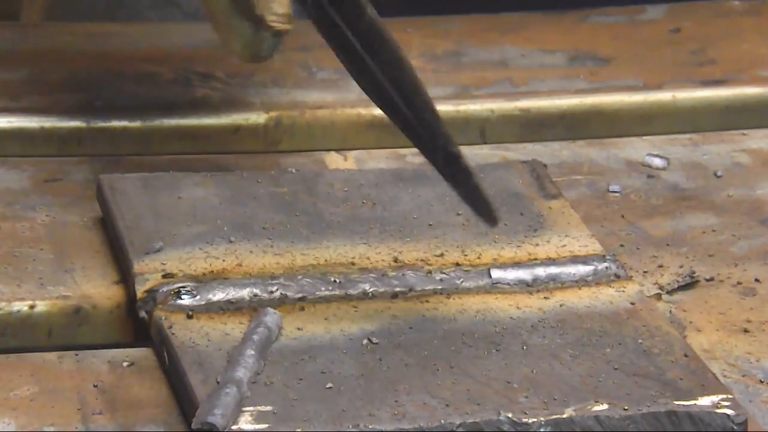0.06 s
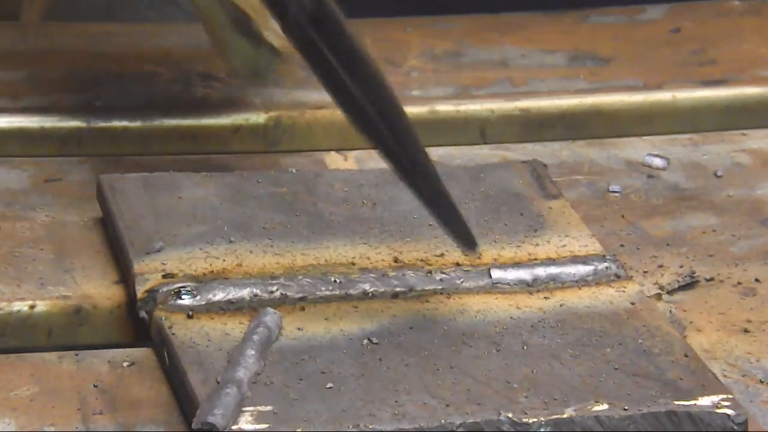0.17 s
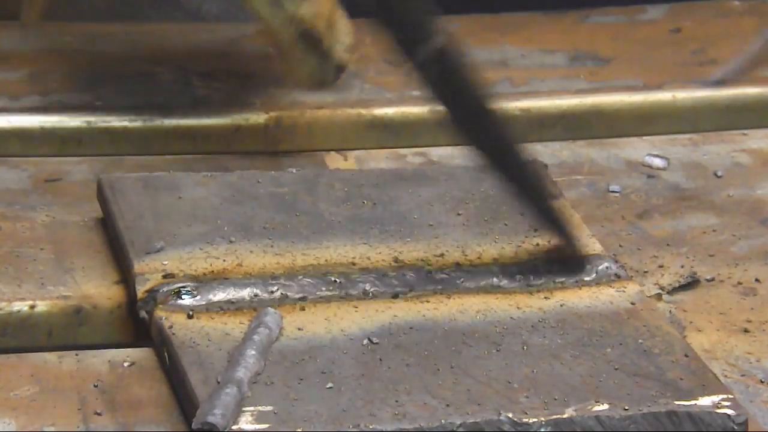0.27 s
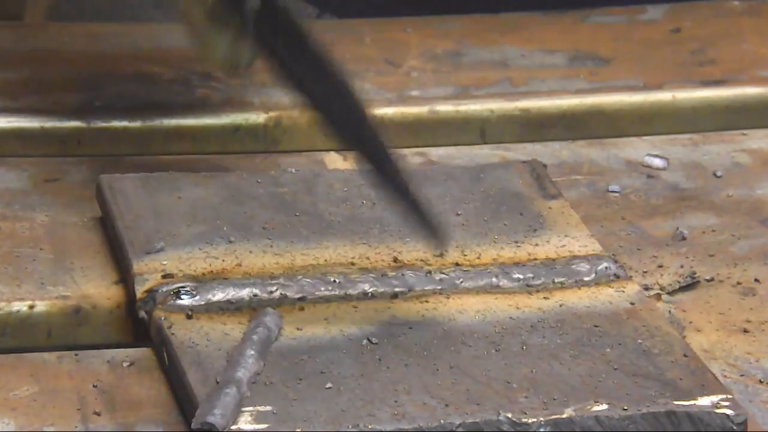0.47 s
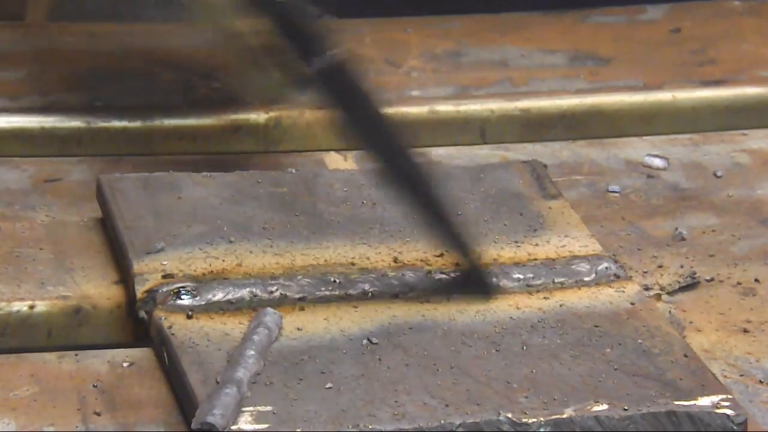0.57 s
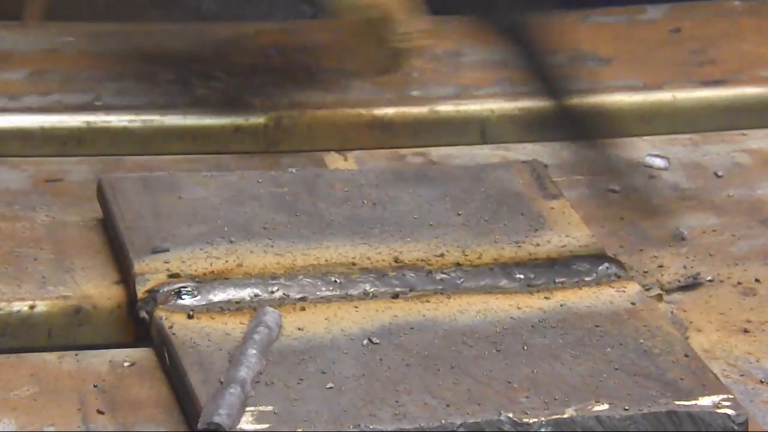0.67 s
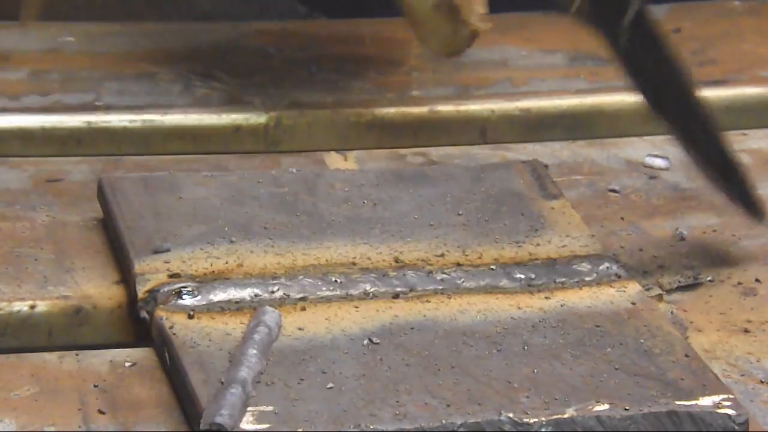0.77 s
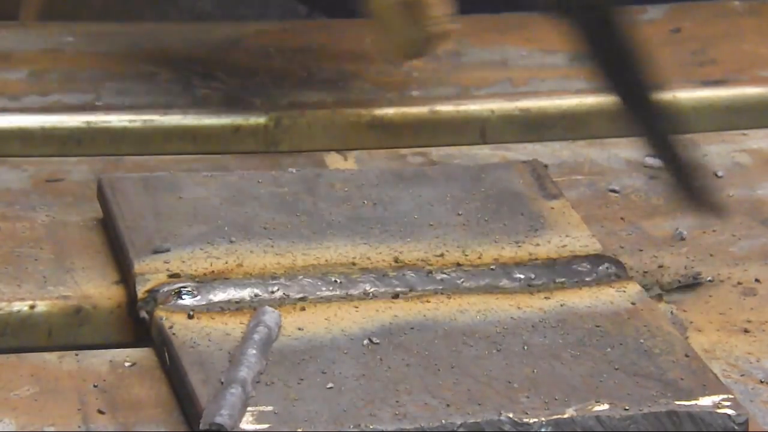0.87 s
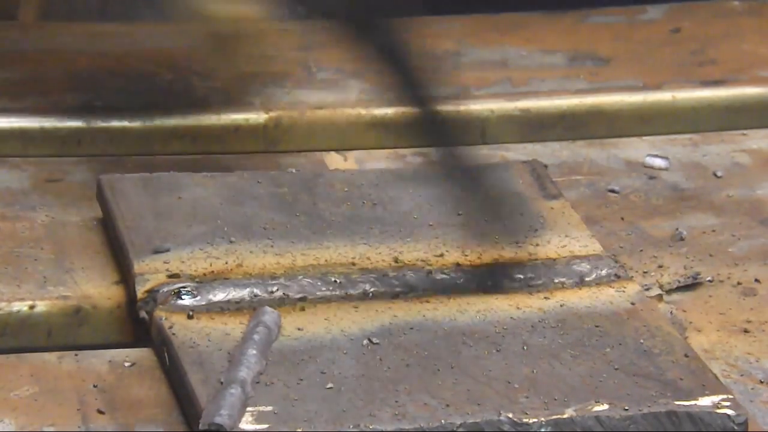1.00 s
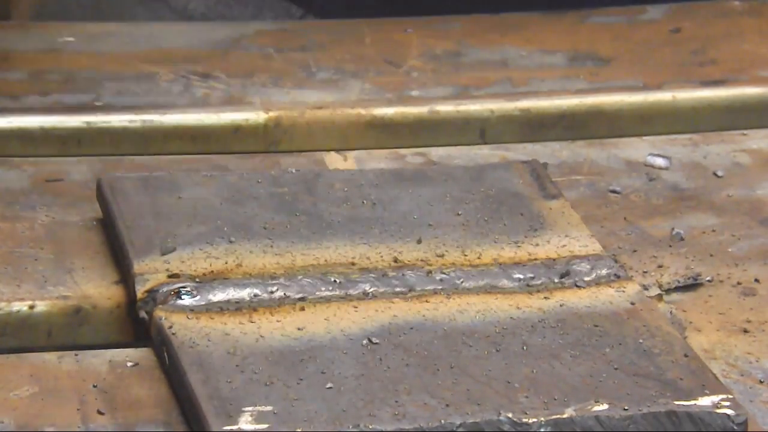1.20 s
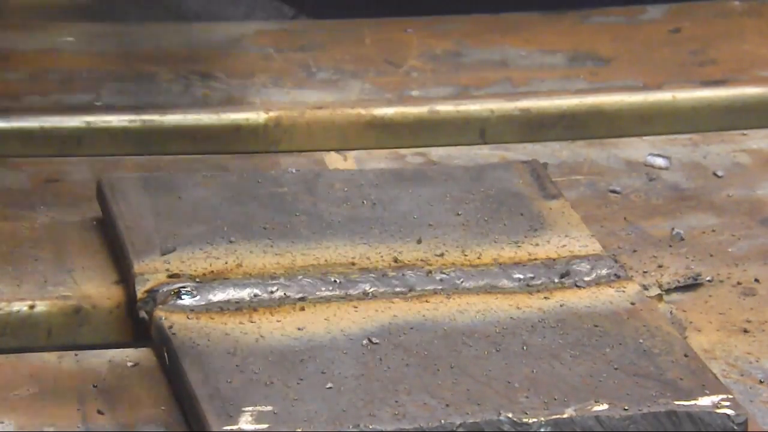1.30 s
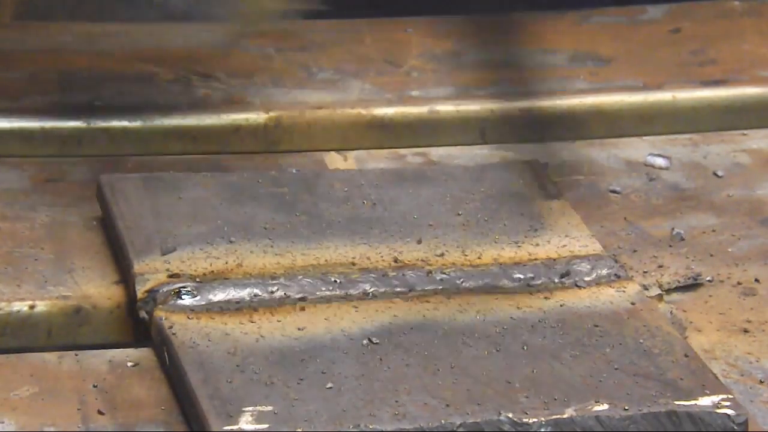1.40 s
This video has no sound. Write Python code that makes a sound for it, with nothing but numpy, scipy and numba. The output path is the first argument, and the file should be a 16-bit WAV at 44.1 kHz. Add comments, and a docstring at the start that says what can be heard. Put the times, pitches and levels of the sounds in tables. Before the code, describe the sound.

Slag is scraped off a steel weld with a pointed tool, close up. Faint workshop hum, then a sharp tick and short gritty scrape at 0.23-0.4 s. A second clicks at 0.53 s, bites hardest near 0.66 s and fades by 0.77 s. The third, 0.98-1.25 s, is longest, rattling with clinks and snapping slag. Chips tick and skitter at 1.24 and 1.3 s; short room reflections, peaks slightly clipped.

```python
"""A pointed steel tool strikes a weld bead and drags along it in three quick strokes; plate and tool ring briefly.
Blows are decaying bright noise that rings steel modes; the drag is dense random grains through the same steel.
Slag snaps off in very short bursts and chips fall with a tick and skitter, over a little room sound.
Workshop noise and a few narrow hum tones lie below. The pair of signals differs slightly in lag and treble;
a gain control sinks under the strokes and the highest peaks clip."""
import sys
import numpy as np
from scipy import signal
from scipy.fft import rfft, irfft, next_fast_len
from scipy.io import wavfile
from numba import njit

SR = 44100
rng = np.random.default_rng(int(sys.argv[2]) if len(sys.argv) > 2 else 0)


def amplitude_ratio(level_db):
    """Convert a level in decibels to the matching linear amplitude (field) ratio."""
    exponent = np.asarray(level_db, float) / 20
    return 10 ** exponent


def materialize(psi):
    """Save the field psi as 16-bit PCM at rate SR to the path in sys.argv[1].

    A 1-D psi becomes a single channel; in a 2-D psi each row is a channel.
    """
    bounded = np.clip(np.atleast_2d(psi).T, -1, 1)
    quanta = np.round(bounded * 32767).astype(np.int16)
    wavfile.write(sys.argv[1], SR, quanta)


N = 63945


def rms_one(x):
    """Scale to rms 1."""
    return x / np.sqrt(np.mean(x ** 2) + 1e-20)


def colour(x, points):
    """Shape a signal causally by a (Hz, dB) table, with minimum phase from the folded cepstrum."""
    size = 4096
    hz = np.maximum(np.arange(size // 2 + 1) * SR / size, 1)
    knots_hz, knots_db = np.transpose(points)
    log_gain = np.log(amplitude_ratio(np.interp(np.log(hz), np.log(knots_hz), knots_db)))
    cepstrum = irfft(log_gain)
    cepstrum[1:size // 2] *= 2
    cepstrum[size // 2 + 1:] = 0
    impulse = irfft(np.exp(rfft(cepstrum)))
    return signal.fftconvolve(x, impulse)[:N]


def drift(rate_hz):
    """Slow random wander of rms 1: noise through two equal one-pole lowpasses."""
    r = np.exp(-2 * np.pi * rate_hz / SR)
    wander = signal.lfilter([1], [1, -2 * r, r * r], rng.standard_normal(N + SR))
    return rms_one(wander[SR:])


def ring(x, hz, t60_s):
    """Two-pole resonator: a unit click sets a decaying sine of starting height 1 ringing."""
    r = amplitude_ratio(-60 / (t60_s * SR))
    w = 2 * np.pi * hz / SR
    return signal.lfilter([0, np.sin(w)], [1, -2 * r * np.cos(w), r * r], x + 1e-18)


def clicks(s, db):
    """Single-sample clicks at the given times."""
    out = np.zeros(N)
    out[(np.asarray(s) * SR).astype(int)] = amplitude_ratio(np.asarray(db))
    return out


def band(x, order, hz, side):
    """Butterworth filter; side is "low" or "high"."""
    return signal.sosfilt(signal.butter(order, hz, side, fs=SR, output="sos"), x)


def bursts(table, t60_s):
    """Sum of sudden exponential decays, one per (s, dB) row."""
    t = np.arange(N) / SR
    return sum(amplitude_ratio(db - 60 * np.maximum(t - s, 0) / t60_s) * (t >= s) for s, db in table)


# Broad colour shared by the blows, the drag and the snaps, with a broad peak near 3.1 kHz. Each row: frequency
# in Hz, relative level in dB per Hz.
WORK_COLOUR = [(88, -48), (150, -27.5), (412, -14.5), (500, -22.5), (1130, -13), (1290, -21.5),
               (1540, -16), (3100, -2), (4070, -13), (5240, -18), (15500, -46)]
# Modes of plate and tool. Each row: frequency in Hz, relative level in dB, t60 in s.
STEEL_MODES = [(1597.7, -5, 0.085), (2060, -5.5, 0.073), (2320, -18, 0.069), (2940, -43, 0.17),
               (2980, -37, 0.34), (3122, 4.5, 0.092), (3400, -2, 0.065), (4690, -26, 0.19),
               (5070, -9, 0.07), (7700, -29, .25), (8600, -46, 0.37), (9700, -27.5, 0.043)]
LOWS_HZ = 1664   # lows lie below, in drag and blows

# Tip dragging over the bead, one list per stroke.
# Each row: time in seconds, level in dB, treble in dB re middle, lows in dB re middle.
DRAG_STROKES = [
    [(.233, -34.5, -4, -7), (.238, -24, 17, 18.5), (.274, -8.5, -9, -2), (.295, -14, -4, 5),
     (.32, -14.5, -3, -2), (.355, -21, -22, -5.5), (.40, -37, -10, -5)],
    [(.527, -34, -4, 5), (.5285, -20.5, 27, -5), (.545, -22.5, 18, -29), (.5745, -22.5, 12.5, -28),
     (.5765, -9, -10, 3), (.595, -11.5, 5.5, 3.5), (.622, -13, -7, 0), (.648, -15, 8, 9),
     (.66, 7.5, -30, -9.5), (.675, -2, -5, -6), (.715, -7, -10, -4.5), (.77, -30.5, -3, 9.5)],
    [(.975, -32, -55, -83), (.98, -12, -26, 6), (.995, -11, -10, 0), (1.03, -1.5, -3.5, 0.5),
     (1.062, -11.5, -3, -1.5), (1.10, -4.5, 7.5, -2), (1.126, -3, -2, -4), (1.152, 3.5, -3, -4),
     (1.159, 1.5, 0, -6.5), (1.166, 4, -7, -13.5), (1.19, -7.5, -27, -2), (1.22, -16.5, -4, -1),
     (1.30, -38.5, 16.5, 13.5)],
]
GRAINS_PER_S, GRAIN_SPREAD_DB = 9000, 2.5
CLUMP_DB, CLUMP_HZ = 2.0, 120
TREBLE_HZ = 5280
TOOL_HZ = 4500   # modes above belong to the tool and ring only when it strikes
DRAG_RING_DB = -5


def drag_steel(force):
    """Broad colour of the tool work and sum of plate modes set off by a force."""
    broad = colour(force, WORK_COLOUR)
    rung = sum(amplitude_ratio(db) * ring(force, hz, t60_s) for hz, db, t60_s in STEEL_MODES if hz < TOOL_HZ)
    return broad, rung


def scrape():
    """Dense clumped grains of force under the stroke excite the broad colour and the plate modes."""
    s, *columns = np.transpose(sum(DRAG_STROKES, []))
    level_db, treble_db, lows_db = [np.interp(np.arange(N) / SR, s, c) for c in columns]
    sizes = amplitude_ratio(GRAIN_SPREAD_DB * np.minimum(rng.exponential(1, N), 4.0)) * rng.choice([-1, 1], N)
    hits = rng.random(N) < GRAINS_PER_S / SR
    grains = rms_one(sizes * hits * amplitude_ratio(CLUMP_DB * drift(CLUMP_HZ)))
    low = band(grains, 4, LOWS_HZ, "low")
    rest = band(grains, 4, LOWS_HZ, "high")
    middle = band(rest, 2, TREBLE_HZ, "low")
    high = band(rest, 2, TREBLE_HZ, "high")
    # treble subtracted: second-order halves would cancel at the crossover
    broad, rung = drag_steel(amplitude_ratio(level_db) * (middle + amplitude_ratio(lows_db) * low - amplitude_ratio(treble_db) * high))
    unit_broad, unit_rung = drag_steel(middle + low - high)
    return broad / unit_broad.std() + amplitude_ratio(DRAG_RING_DB) * rung / unit_rung.std()


# Sharp blows of the tip. Each row: start in seconds, relative level in dB, lows in dB re level,
# frequency in Hz that picks the nearest mode, boost of that mode in dB.
TIP_BLOWS = [(0.2344, -3, -10, 9700, 26), (0.5271, 2, -22, 9700, 23), (0.5762, -7, -3, 2060, 26),
             (.656, -1, -4, 3122, -14), (.977, -18, 27, 8600, 47.5), (1.031, -3, -20, 2320, 27),
             (1.046, -16, -22, 7700, 45), (1.091, -5, -15, 5070, 32), (1.124, -17, 2, 8600, 58.5),
             (1.14, -11, -5, 4690, 14)]
CRACK_T60_S = 0.022
BLOW_RING_DB, CLICK_DB, MODE_SPREAD_DB = -14.5, -10.5, 2.5
THUD_HZ, THUD_T60_S, THUD_DB = 288, 0.011, -36


def blows():
    """Each blow: bright noise crack, click and chatter into a fresh mix of modes with one favoured, low thud."""
    s, db, lows_db, favoured_hz, boost_db = np.transpose(TIP_BLOWS)
    t = np.arange(N) / SR
    falls = [amplitude_ratio(-60 * np.maximum(t - a, 0) / CRACK_T60_S) * (t > a - 1 / SR) for a in s]
    grit = rms_one(np.diff(colour(rng.standard_normal(N), WORK_COLOUR), prepend=0))
    low = band(grit, 4, LOWS_HZ, "low")
    high = band(grit, 4, LOWS_HZ, "high")
    crack = .5 * (amplitude_ratio(db) @ falls * high + amplitude_ratio(db + lows_db) @ falls * low)

    mix_db = rng.normal(0, MODE_SPREAD_DB, (len(s), len(STEEL_MODES)))
    nearest = np.abs(favoured_hz[:, None] - np.array(STEEL_MODES)[:, 0]).argmin(axis=1)
    chatter = .5 * rng.standard_normal(N) / np.sqrt(CRACK_T60_S * SR / (2 * np.log(1000)))
    force = chatter + clicks(s, 0 * db + CLICK_DB)
    slow_falls = [np.sqrt(f) for f in falls]   # chatter outlasts the crack
    rung = np.zeros(N)
    for k, (hz, mode_db, t60_s) in enumerate(STEEL_MODES):
        force_db = db + mode_db + BLOW_RING_DB + mix_db[:, k]
        force_db = force_db + boost_db * (nearest == k) + lows_db * (hz < LOWS_HZ)
        rung += ring(force * (amplitude_ratio(force_db) @ slow_falls), hz, t60_s)
    thud = ring(clicks(s, db + lows_db + THUD_DB), THUD_HZ, THUD_T60_S)
    return crack + rung + thud


# Flakes of slag snapping off under the tip. Each row: start in seconds, starting level in dB.
SLAG_SNAPS = [(1.0062, 0), (1.019, -1), (1.027, 2), (1.0372, 0), (1.1015, 1), (1.1058, 0), (.665, 0)]
SNAP_T60_S = 0.007


def snaps():
    """Each flake breaks with a very short noise burst in the broad colour of the tool work."""
    envelope = bursts(SLAG_SNAPS, SNAP_T60_S)
    noise = rng.standard_normal(N)
    return colour(envelope * noise, WORK_COLOUR) / colour(noise, WORK_COLOUR).std()


# Loose slag chips falling on the bench. Each row: start in seconds, starting level of the skitter in dB.
SLAG_CHIPS = [(1.2387, -15.5), (1.305, -23.5)]
# Colour of the skitter. Each row: frequency in Hz, relative level in dB per Hz.
SKITTER_COLOUR = [(1800, -13), (3300, 5.5), (9500, -26), (15000, -39)]
CHIP_T60_S, CHIP_GRAINS_PER_S = 0.34, 7000
TICK_HZ, TICK_T60_S, TICK_DB = 10200, 0.007, -1.5   # dB re chip


def chips():
    """Small brittle chips land with a bright ringing tick and skitter as decaying coloured grains."""
    envelope = bursts(SLAG_CHIPS, CHIP_T60_S)
    grains = rng.standard_normal(N) * (rng.random(N) < CHIP_GRAINS_PER_S / SR)
    skitter = envelope * rms_one(colour(grains, SKITTER_COLOUR))
    s, db = np.transpose(SLAG_CHIPS)
    return skitter + ring(clicks(s, db + TICK_DB), TICK_HZ, TICK_T60_S)


ROOM_T60_S, ROOM_DB = 0.23, -7.5


def room(x):
    """Dense reflections from bench and walls: convolution with decaying noise of unit energy."""
    tail = rng.standard_normal(N // 2) * amplitude_ratio(-60 * np.arange(N // 2) / SR / ROOM_T60_S)
    return signal.fftconvolve(x, tail / np.linalg.norm(tail))[:N]


# Colour of the workshop noise. Each row: frequency in Hz, relative level in dB per Hz.
SHOP_COLOUR = [(12, -38), (20, 0), (149, -24.5), (245, -2), (298, -5.5), (440, -10), (520, -12),
               (650, -12.5), (3090, -14), (15500, -58.5)]
# Hum tones. Each row: frequency in Hz, width in Hz, rms level in dB.
HUM_TONES = [(244, 25, -41), (345, 20, -43), (395, 6, -40), (445, 4, -36), (668, 6, -45), (1168, 10, -41)]
SHOP_DB = -33.5


def shop():
    """Broad coloured noise plus hum tones, each noise through a narrow resonance."""
    out = amplitude_ratio(SHOP_DB) * rms_one(colour(rng.standard_normal(N), SHOP_COLOUR))
    for hz, width_hz, db in HUM_TONES:
        t60_s = np.log(1000) / np.pi / width_hz
        tone = ring(rng.standard_normal(N + SR), hz, t60_s)[SR:]
        out = out + amplitude_ratio(db) * rms_one(tone)
    return out


# Lag of the left port behind the right. Each row: frequency in Hz, lag in microseconds.
PORT_LAG = [(700, 4.1), (2400, 15.2), (15000, 30)]
UNALIKE_DB, UNALIKE_HZ = -10, 7000


def ports(mid):
    """Two ports hear nearly the same sound: left a little later, scattered treble of opposite sign in each."""
    size = next_fast_len(N + 64)
    hz = np.arange(size // 2 + 1) * SR / size
    knots_hz, knots_us = np.transpose(PORT_LAG)
    lag_s = np.interp(np.log(hz + 1), np.log(knots_hz), knots_us) / 10 ** 6
    turn = np.exp(-1j * np.pi * hz * lag_s)   # half the lag; the right port is advanced by as much
    pair = irfft(rfft(mid, size) * np.array([turn, 1 / turn]), size)[:, :N]
    scatter = rng.standard_normal(2000) * amplitude_ratio(-np.arange(2000) / 50)
    other = signal.fftconvolve(mid, scatter / np.linalg.norm(scatter))[:N]
    return pair + amplitude_ratio(UNALIKE_DB) * band(other, 1, UNALIKE_HZ, "high") * [[1], [-1]]


def scene():
    """Tool work with its room sound, over the workshop, at two ports."""
    work = scrape() + blows() + snaps() + chips()
    return ports(work + amplitude_ratio(ROOM_DB) * room(work) + shop())


GAIN_KNEE_DB, GAIN_SENSE_S = -19.5, 0.0032
GAIN_FALL_DB_PER_S_PER_DB, GAIN_RISE_DB_PER_S = 11.5, 20   # fall is per dB over the knee
CLIP_LEVEL = 1.02


@njit
def ride(level_db, knee_db, fall, rise):
    """Gain in dB falls while the output is over the knee and creeps back under it; fall, rise per sample."""
    gain_db, g = np.zeros(len(level_db)), 0.
    for i in range(len(level_db)):
        over = level_db[i] + g - knee_db
        g = g - fall * over if over > 0 else min(0., g + rise)
        gain_db[i] = g
    return gain_db


def top_cut(x):
    """Nothing passes above the cut-off."""
    return signal.sosfilt(signal.butter(12, 15690, fs=SR, output="sos"), x)


def record(dry):
    """Gain control driven by the smoothed power of both channels, then hard clipping."""
    r = np.exp(-1 / (GAIN_SENSE_S * SR))
    power = signal.lfilter([1 - r], [1, -r], np.mean(dry ** 2, 0))
    level_db = 10 * np.log10(power + 1e-12)
    gain_db = ride(level_db, GAIN_KNEE_DB, GAIN_FALL_DB_PER_S_PER_DB / SR, GAIN_RISE_DB_PER_S / SR)
    mix = np.clip(dry * amplitude_ratio(gain_db), -CLIP_LEVEL, CLIP_LEVEL)
    return top_cut(mix)


dry = scene()
out = record(dry)
materialize(out)
```